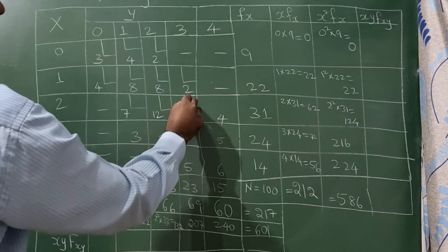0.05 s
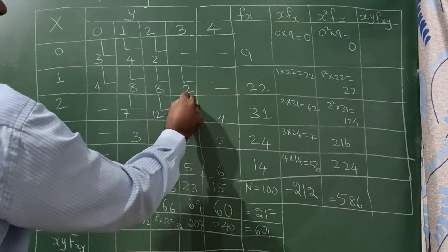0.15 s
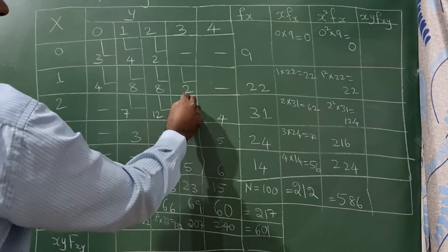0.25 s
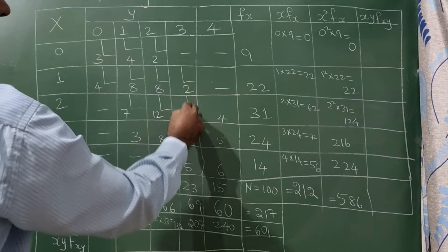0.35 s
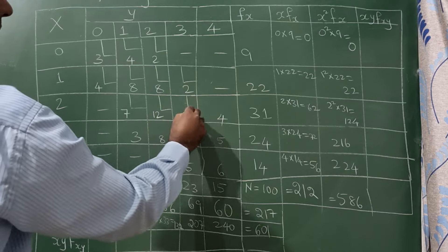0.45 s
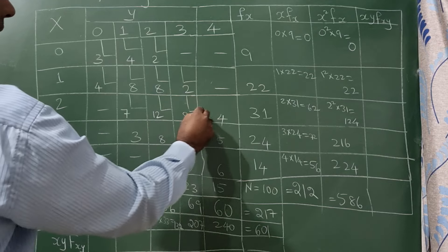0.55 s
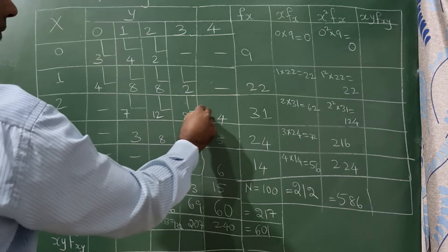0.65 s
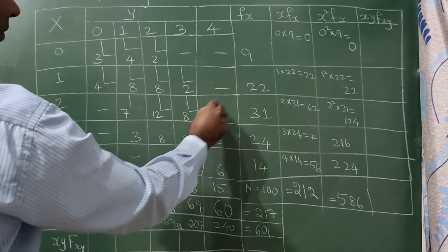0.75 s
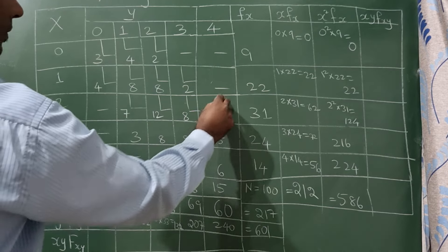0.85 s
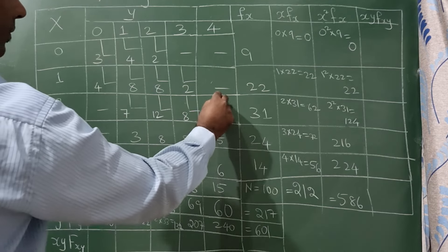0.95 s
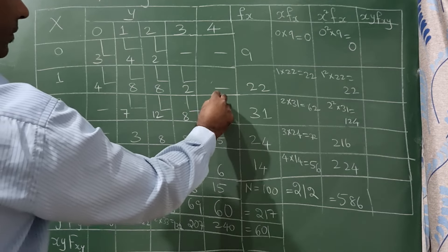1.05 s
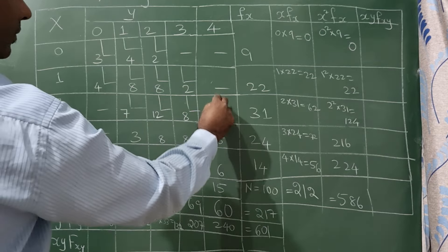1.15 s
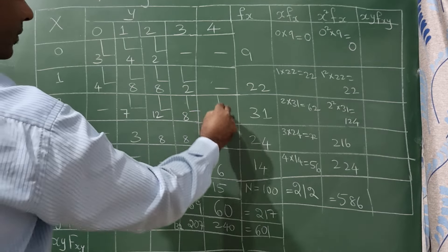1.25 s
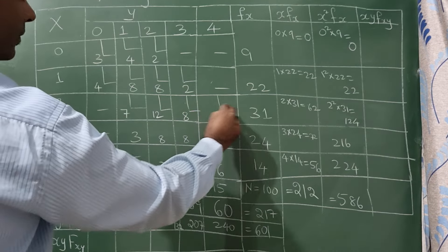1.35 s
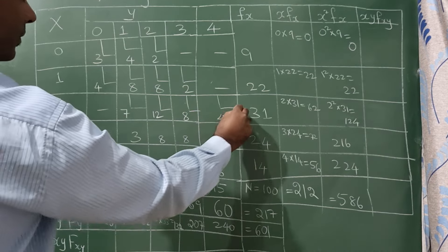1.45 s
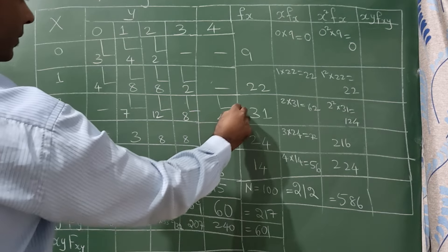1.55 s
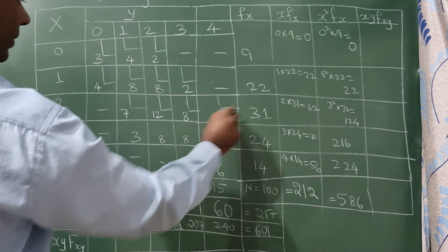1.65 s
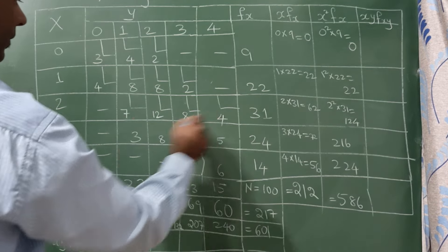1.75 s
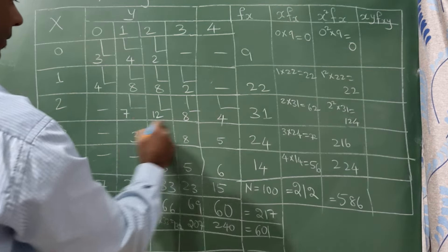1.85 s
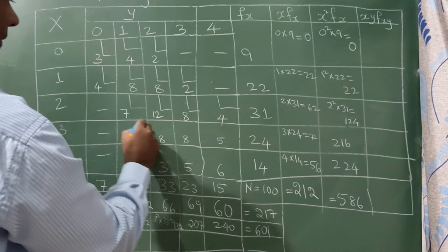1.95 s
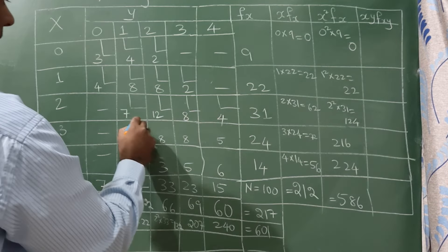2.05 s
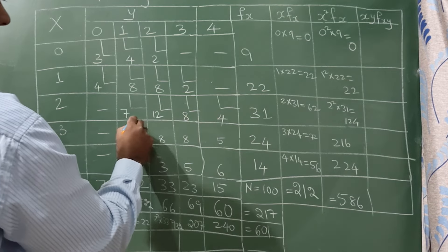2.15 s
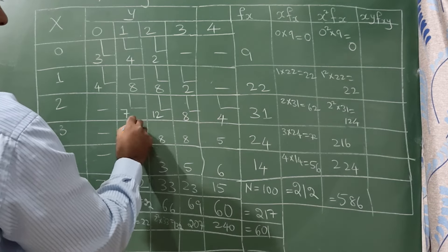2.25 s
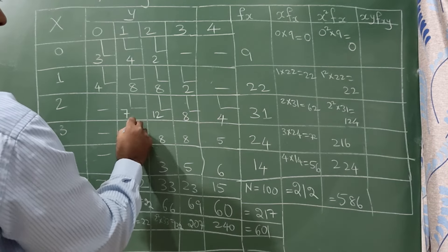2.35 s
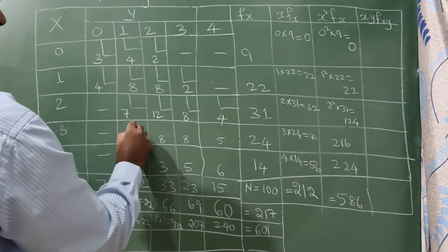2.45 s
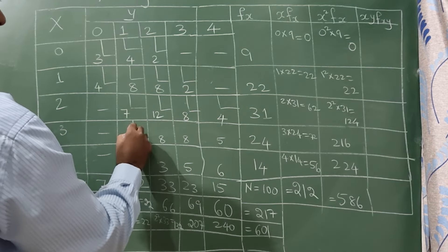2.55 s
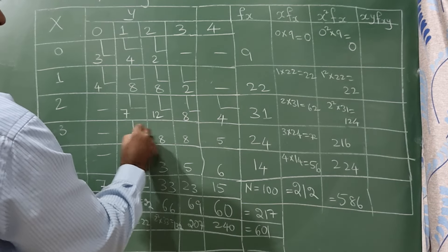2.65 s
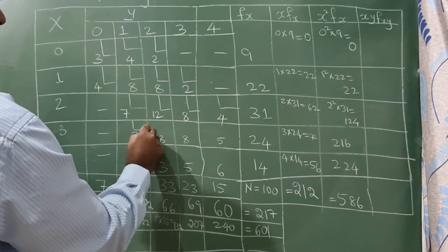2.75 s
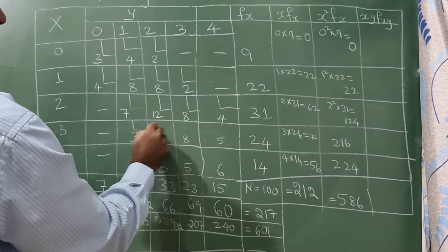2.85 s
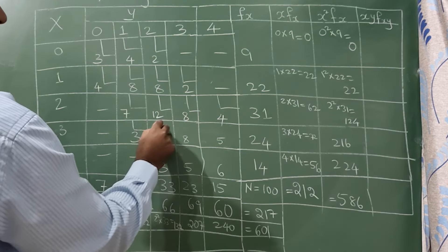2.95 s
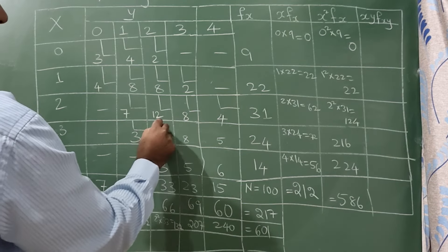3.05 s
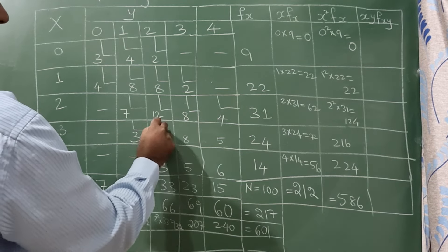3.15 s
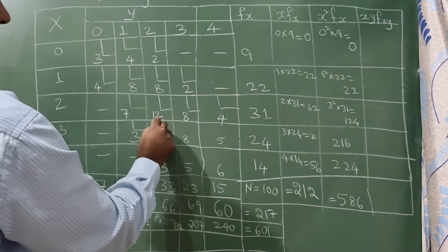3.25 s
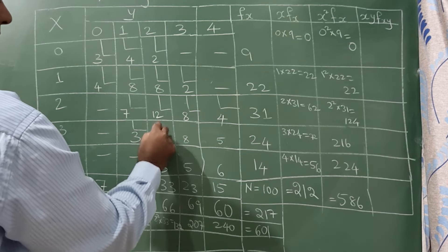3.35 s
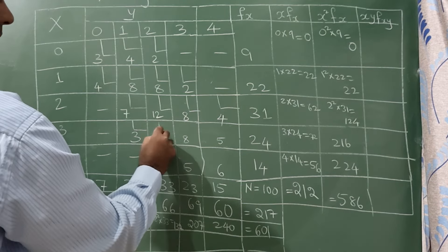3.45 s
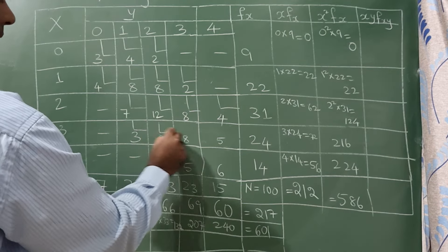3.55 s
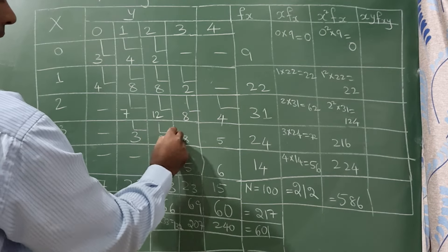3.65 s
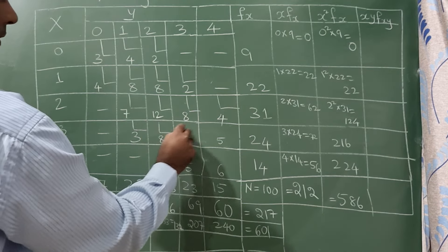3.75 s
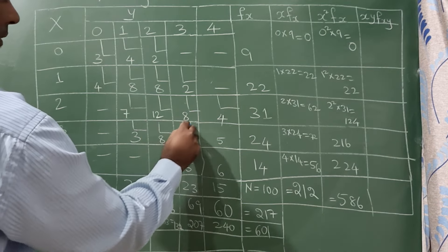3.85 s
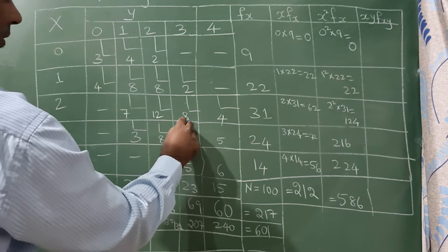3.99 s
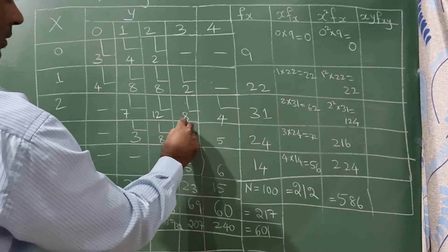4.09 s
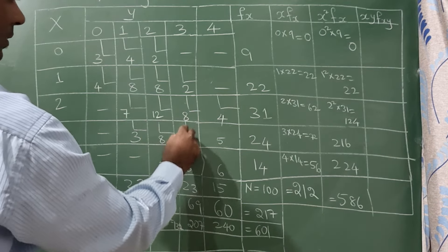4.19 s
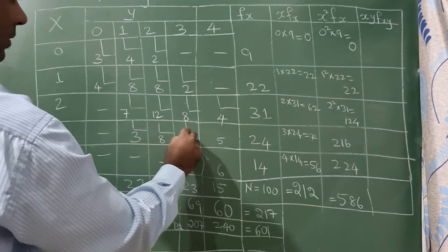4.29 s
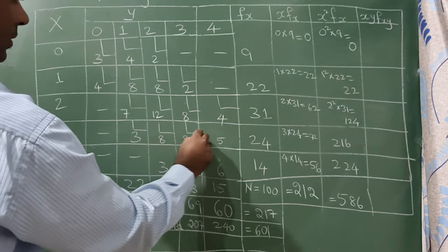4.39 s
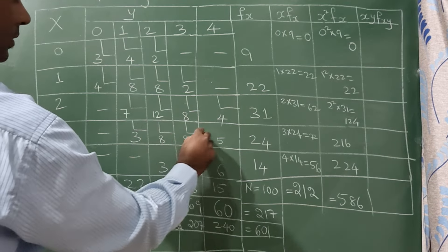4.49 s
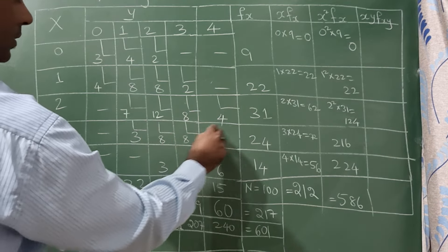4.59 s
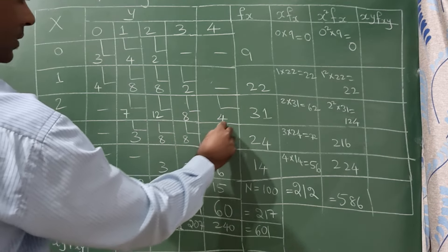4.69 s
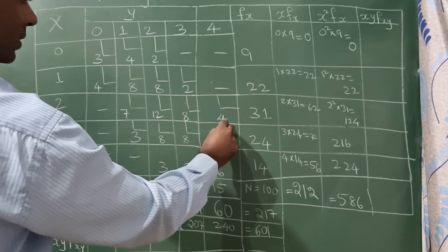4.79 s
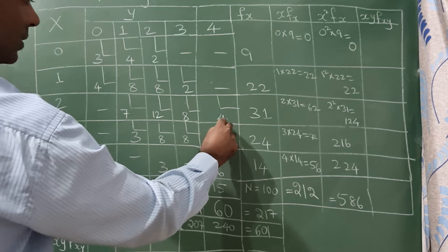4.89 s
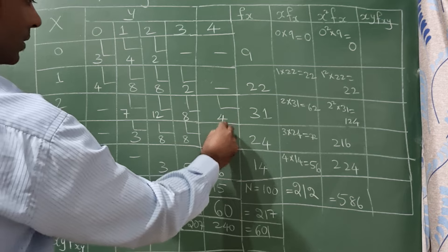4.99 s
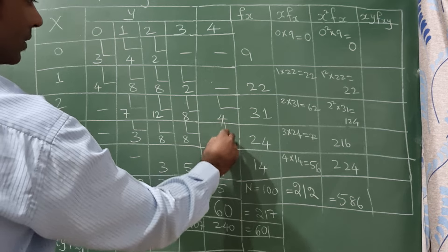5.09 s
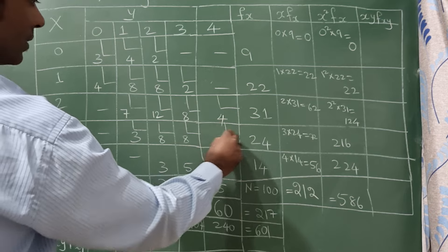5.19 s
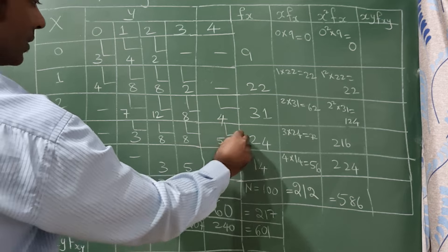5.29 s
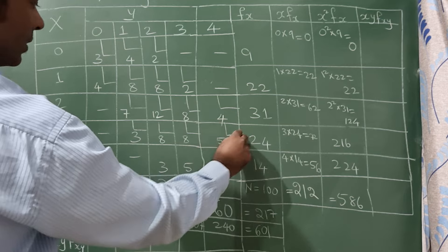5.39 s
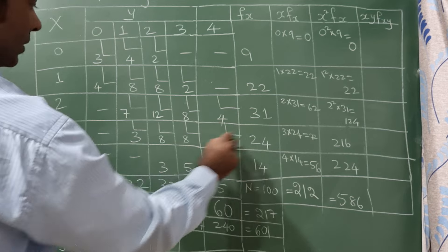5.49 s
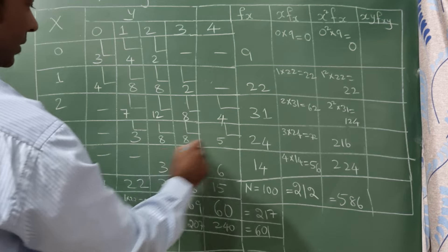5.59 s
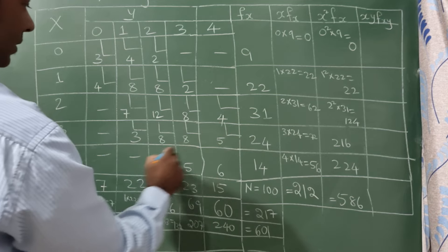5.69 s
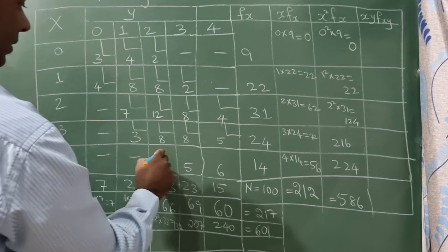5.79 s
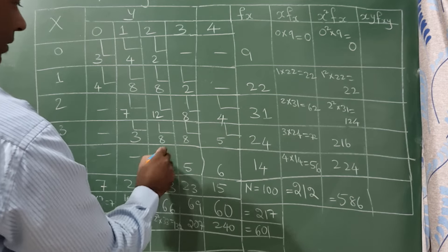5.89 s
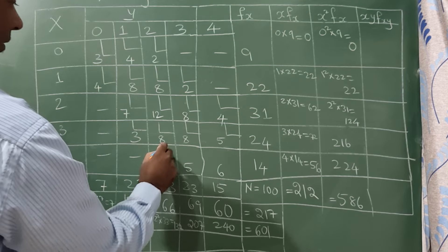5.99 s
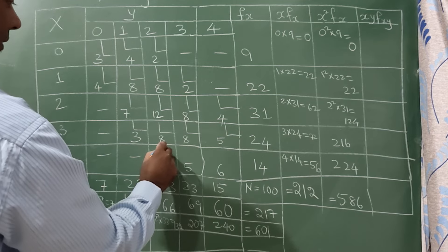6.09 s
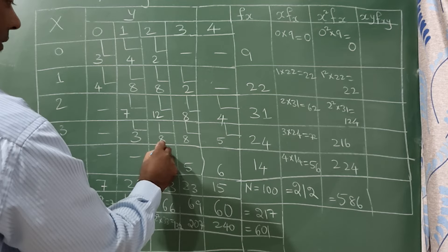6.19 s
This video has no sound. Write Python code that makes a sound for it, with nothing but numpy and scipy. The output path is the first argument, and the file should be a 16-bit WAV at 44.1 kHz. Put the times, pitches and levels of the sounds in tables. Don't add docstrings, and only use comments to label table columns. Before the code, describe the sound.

Chalk lands on a board roughly every second, six times, with resonant woody knocks dominating and a lively room tail. After each come two tiny gritty scrapes, much quieter, the second shaking the board slightly. The second knock is softest but has a crisp tip crack, and its mark ends in a skip. Faint cloth rustles and crumb clicks fill the gaps above low fan rumble and hiss, picked up by a phone two metres away.

```python
import sys
import numpy as np
from scipy import signal
from scipy.fft import rfft, irfft, next_fast_len
from scipy.io import wavfile
from scipy.ndimage import uniform_filter1d, map_coordinates

SR = 44100
rng = np.random.default_rng(int(sys.argv[2]) if len(sys.argv) > 2 else 0)


def magnitude_from_level(level_db):
    exponent = np.asarray(level_db, float) / 20
    return 10 ** exponent


def waveform_to_disk(signal):
    frames = np.transpose(np.atleast_2d(signal))
    scaled = np.clip(frames, -1, 1) * 32767
    samples = np.round(scaled).astype(np.int16)
    wavfile.write(sys.argv[1], SR, samples)


N = 274743

# (frequency [Hz], level [dB per Hz])
AIR_SPECTRUM = [(15, -40), (25, -59), (38, -8.5), (59, 0.5), (127, -3), (186, -6), (418, -15.5), (645, -13),
                (719, -19), (780, -16.5), (2120, -25.5), (4540, -29), (9420, -30.5), (14500, -28.5),
                (16200, -38)]
# (frequency [Hz], width [Hz], level [dB])
FAN_WHINE = (648, 14, -67)
# (time [s], level [dB])
DUST_WHIFFS = [
    (0.08, -63),
    (1.65, -59),
    (3.01, -60),
    (4.85, -63),
]
# (frequency [Hz], level [dB per Hz])
DUST_SPECTRUM = [(5500, -30), (7500, -3), (8500, -1), (9500, -2), (12000, -30)]
# (time [s], level [dB])
SLEEVE_RUSTLES = [
    (0.084, -54.5),
    (1.082, -57.5),
    (2.082, -51),
    (4.082, -51),
    (6.084, -54.5),
]
# (frequency [Hz], level [dB per Hz])
CLOTH_SPECTRUM = [(500, -9), (1200, 5.5), (2700, -1), (4500, 0.5), (7000, -12)]

# (time [s], peak [dB], crack [dB], room [dB], crack brightness [dB])
KNOCKS = [
    (0.284, -6, -21.5, 5, -2),
    (1.154, -13.5, -3.5, 7.5, -10),
    (2.381, -6.5, -21.5, 8, 14),
    (3.287, -7.5, -27, 5, 2),
    (4.131, -5, -18, 5.5, 4),
    (4.987, -10.5, -26, 7, 6),
]
# (frequency [Hz], level [dB per Hz])
KNOCK_SPOTS = [
    [(275, -2), (326, -24), (370, -1), (432, -11.5), (574, -3), (915, 1.5), (1880, -16), (2430, -33.5)],
    [(267, -19.5), (342, -4.5), (419, -18.5), (648, 0), (1150, -15), (1330, -3), (2250, -29), (3170, -30)],
    [(299, -10.5), (381, -6.5), (426, -10), (634, 1), (1040, -13.5), (1290, -9), (1990, -23), (2430, -43)],
    [(271, -5.5), (308, -15.5), (381, 0.5), (420, -11.5), (574, 0), (784, -3.5), (1500, -13), (2170, -32.5)],
    [(275, -6), (312, -20), (375, -3), (420, -9), (471, -7), (795, -0.5), (1940, -22), (2170, -33.5)],
    [(239, -23), (331, -5), (420, -21), (652, -1.5), (915, 0), (1130, -4.5), (1660, -16), (2230, -36)],
]
# (frequency [Hz], level [dB per Hz])
BOARD_LOW = [(100, -39), (170, -23.5)]
# (frequency [Hz], level [dB per Hz])
BOARD_HIGH = [(3600, -41), (5000, -54.5), (6500, -70), (11000, -120)]
# (frequency [Hz], level [dB], time to fall 60 dB [s])
BOARD_MODES = [(172.8, 9.5, 1), (237.6, -4, 1), (287, -4, 1), (319, 6.5, 0.099), (380.3, 14.5, 0.36),
               (482.8, 20, 0.26), (536, 2.5, 0.65), (651.4, 3, 0.59), (627, 3, 0.38), (593, 5.5, 0.45),
               (1050, -17, 0.45), (1350, -13, 0.44), (1700, -6, 0.15), (1913, 9, 0.33), (801, 10, 0.36),
               (827, 13.5, 0.2), (933, 9.5, 0.43), (967, -1.5, 0.41), (1130, -17, 0.26), (1300, -17, .35),
               (1490, 13, 0.26), (1830, -17, 0.13)]
# (frequency [Hz], time to fall 60 dB [s])
ROOM_DECAY = [(150, 0.95), (400, 0.79), (1000, 0.49), (2500, 0.57), (6000, 0.74)]
# (frequency [Hz], level [dB per Hz])
CRACK_SPECTRUM = [(1500, -83), (3000, 10.5), (4500, 5), (6500, -6), (8500, -12), (11500, -11), (14000, -6),
                  (15800, -16), (18000, -54)]
# (frequency [Hz], level [dB per Hz])
THUD_SPECTRUM = [(25, -25), (55, -1), (110, -7.5), (150, 1.5), (230, -38), (500, -86)]

# (full speed from [s], held [s], squeak [dB], grit [dB], stick resonance [Hz])
STROKES = [(0.398, .046, -51.5, -54, 12500), (0.6, 0.044, -51.5, -55.5, 12700),
           (1.29, 0.015, -53, -52, 13100), (1.485, 0.059, -46, -50, 13400), (2.48, .07, -55, -62, 12200),
           (2.755, 0.038, -49, -60.5, 13900), (3.44, 0.016, -45.5, -58, 12100),
           (3.63, 0.024, -46.5, -54.5, 11200), (4.224, 0.059, -51, -55.5, 12100),
           (4.445, 0.011, -46.5, -54.5, 11400), (5.105, 0.056, -55, -58, 12800),
           (5.308, 0.037, -49, -52, 12200)]
# (time [s], held [s], level [dB])
GLIDES = [
    (1.72, 0.24, -61.5),
    (5.6, 0.15, -62),
]
# (frequency [Hz], level [dB per Hz])
SQUEAK_SPECTRUM = [(4710, -38), (8000, -12), (9610, -7.5), (11100, -1), (13200, -5), (14400, 4.5),
                   (15300, -1), (16200, -13.5)]
# (frequency [Hz], level [dB per Hz])
GRIT_SPECTRUM = [(1470, -44), (2500, 2), (3250, 0.5), (3520, -4), (3710, -3), (5070, 1), (6550, -5),
                 (8120, -4), (10000, -4.5), (13000, -36), (22000, -120)]
# (frequency [Hz], width [Hz], lift [dB])
STICK_MODES = [(3750, 250, 3), (6300, 350, 5)]
# (peak time [s], held [s], level [dB])
DRAGS = [
    (0.611, 0.016, -41),
    (1.518, 0.0076, -35),
    (2.756, 0.012, -47),
    (3.63, 0.019, -41.5),
    (4.435, .05, -41.5),
    (5.3, 0.058, -39),
]
# (frequency [Hz], level [dB per Hz])
DRAG_SPOTS = [
    [(300, -17), (480, -4), (653, -28), (811, -1.5), (1540, -12.5), (1750, -6), (2000, -26)],
    [(300, -8.5), (653, -20), (1070, -10), (1230, -2.5), (1670, -12), (1880, -2), (2020, -20)],
    [(300, 1), (895, -4.5), (1360, -9), (1650, -11)],
    [(300, -1), (585, -3), (677, 2.5), (1160, -6.5), (1600, -4), (2290, -21)],
    [(300, -0.5), (714, -6), (1000, 1.5), (1300, -7.5), (1580, -6.5), (1750, -17), (2210, -18)],
    [(300, -6.5), (393, -16), (560, -2.5), (635, -12.5), (903, 0.5), (1200, 0), (1500, -6)],
]
# (frequency [Hz], level [dB per Hz])
DRAG_LOW = [(180, -41.5)]
# (frequency [Hz], level [dB per Hz])
DRAG_HIGH = [(2600, -17.5), (3380, -55), (5720, -120)]

# (time [s], peak [dB])
SNAPS = [
    (1.5469, -19.5),
]
# (frequency [Hz], level [dB], time to fall 60 dB [s])
SNAP_MODES = [(1354, -7, 0.27), (1833, 5.5, 0.068), (2330, -2, 0.036), (2400, -18, .03)]
# (frequency [Hz], level [dB per Hz])
SNAP_SPECTRUM = [(500, -24), (900, -5), (1100, -31), (1300, -11), (1550, -10), (1840, -1), (2400, -5),
                 (2750, -19.5), (4000, -27), (6000, -51)]
# (time [s], peak [dB], frequency [Hz])
CRUMBS = [
    (1.5427, -29, 13900),
    (2.6983, -43, 14800),
    (2.7277, -43.5, 14300),
    (3.8606, -32.5, 9950),
    (5.5517, -35, 13300),
    (5.8505, -44, 13900),
]
# (frequency [Hz], side against middle [dB])
SIDE_LEVEL = [(60, -38), (110, -35), (200, -31), (380, -29), (700, -31), (1290, -29), (2380, -21),
              (4400, -33), (8120, -17), (15000, -27)]


def unit(x):
    return x / np.sqrt(np.mean(x ** 2) + 1e-20)


def along(points, hz):
    f, v = np.transpose(points)
    return np.interp(np.log(hz + 1), np.log(f + 1), v)


def wobble(rate):
    knots = rng.standard_normal(int(N * rate / SR) + 4)
    return map_coordinates(knots, [np.arange(N) * rate / SR])


def coloured(x, spectrum):
    m = 2 * next_fast_len(len(x) // 2 + 4096)
    gain = magnitude_from_level(along(spectrum, np.fft.rfftfreq(m, 1 / SR)))
    cepstrum = irfft(np.log(np.maximum(gain, 1e-6)), m)
    cepstrum[1:m // 2] *= 2
    cepstrum[m // 2 + 1:] = 0
    return irfft(rfft(x, m) * np.exp(rfft(cepstrum)), m)[:len(x)]


def resonant(x, centre_hz, width, lift_db):
    hz, t, z = signal.stft(x, SR, nperseg=512)
    centre = centre_hz[np.minimum((t * SR).astype(int), N - 1)]
    peak = 1 / np.sqrt(1 + ((hz[:, None] - centre) / (width * centre)) ** 2)
    return signal.istft(z * (1 + magnitude_from_level(lift_db) * peak ** 2), SR, nperseg=512)[1][:N]


def patchy(x, depth_db):
    z = signal.stft(x, nperseg=256)[2]
    field = uniform_filter1d(rng.standard_normal(z.shape), size=5, axis=0)
    field = uniform_filter1d(field, size=30, axis=1)
    return signal.istft(z * magnitude_from_level(depth_db * unit(field)), nperseg=256)[1][:N]


def grains(size):
    present = rng.random(size) < 0.5
    strength = magnitude_from_level(1.5 * rng.standard_normal(size))
    return present * strength * rng.standard_normal(size)


def tail(gap_s):
    hz, t, z = signal.stft(rng.standard_normal(SR), SR, nperseg=256)
    fade_db = -60 * t / along(ROOM_DECAY, hz)[:, None]
    closing_db = -6.04 * (t / 0.18) ** 2
    x = signal.istft(z * magnitude_from_level(fade_db + closing_db), SR, nperseg=256)[1][:SR]
    x = x * (1 - np.exp(-np.arange(SR) / SR / gap_s))
    return x / np.linalg.norm(x)


def ring(modes, scatter_db):
    t, out = np.arange(SR) / SR, np.zeros(SR)
    for hz, db, t60 in modes:
        level_db = db + scatter_db * rng.standard_normal() - 60 * t / t60
        out += rng.choice([-1, 1]) * magnitude_from_level(level_db) * np.sin(2 * np.pi * hz * t)
    return out


def add(track, s, sound):
    part = track[round(s * SR):][:len(sound)]
    part += sound[:len(part)]


def swell(s, held_s, rise, fall):
    t = np.arange(N) / SR
    return -rise * np.maximum(s - t, 0) - fall * np.maximum(t - s - held_s, 0)


def glide_db():
    return np.max([db + swell(s, held, rise=33, fall=17) for s, held, db in GLIDES], axis=0)


def air():
    hz, width, db = FAN_WHINE
    phase = 2 * np.pi * np.cumsum(hz + width * wobble(40)) / SR
    whine = np.sin(phase) * magnitude_from_level(db + 3.0 * wobble(23))
    t, close_s = np.arange(N) / SR, 0.28
    opening = np.max([(t > s) * np.exp(-np.abs(t - s) / close_s) for s, *_ in KNOCKS], axis=0)
    opening += magnitude_from_level(glide_db() + 55.5)
    level_db = -54 + 5 * opening + 3 + 0.6 * wobble(2.59)
    return magnitude_from_level(level_db) * unit(coloured(rng.standard_normal(N), AIR_SPECTRUM)) + whine


def dust():
    whiff_db = np.max([db + swell(s, 0, rise=160, fall=160) for s, db in DUST_WHIFFS], axis=0)
    return magnitude_from_level(whiff_db) * unit(coloured(grains(N), DUST_SPECTRUM))


def sleeve():
    rustle_db = np.max([db + swell(s, 0, rise=1300, fall=100) for s, db in SLEEVE_RUSTLES], axis=0)
    return magnitude_from_level(rustle_db + 2.0 * wobble(80)) * unit(coloured(rng.standard_normal(N), CLOTH_SPECTRUM))


def board_knock(spot, room_db):
    t, wall_delay_s, wall_db = np.arange(SR) / SR, 0.009, -2.5
    modes = ring(BOARD_MODES, scatter_db=1.5)
    body = magnitude_from_level(-7.5) * modes / np.linalg.norm(modes)
    flex = magnitude_from_level(-23.0 - 60 * t / 0.032) * rng.standard_normal(SR)
    flex[0] = magnitude_from_level(-20)
    wall_echo = magnitude_from_level(wall_db) * np.roll(flex, round(wall_delay_s * SR))
    body += magnitude_from_level(room_db) * tail(gap_s=0.001) + flex + wall_echo
    return coloured(body, BOARD_LOW + spot + BOARD_HIGH)


def tip_crack(bright_db):
    t = np.arange(SR) / SR
    spectrum = [(hz, level + bright_db * (hz > 7000)) for hz, level in CRACK_SPECTRUM]
    crack = coloured(rng.standard_normal(SR) * magnitude_from_level(-60 * t / 0.018), spectrum)
    return crack + magnitude_from_level(-10) * signal.fftconvolve(crack, tail(gap_s=0.0032))[:SR]


def knocks():
    out = np.zeros(N)
    for (s, db, crack_db, room_db, bright_db), spot in zip(KNOCKS, KNOCK_SPOTS):
        thud = coloured(tail(gap_s=0.0074), THUD_SPECTRUM)
        add(out, s, magnitude_from_level(db - 21) * unit(board_knock(spot, room_db)))
        add(out, s, magnitude_from_level(db - 49.5) * unit(thud))
        add(out, s, magnitude_from_level(db + crack_db - 36.0) * unit(tip_crack(bright_db)))
    return out


def squeak(slip):
    middle_s = [s + held / 2 for s, held, *_ in STROKES]
    stick_hz = np.interp(np.arange(N) / SR, middle_s, [row[-1] for row in STROKES])
    sound = resonant(coloured(grains(N), SQUEAK_SPECTRUM), stick_hz, width=0.045, lift_db=3.5)
    sound = resonant(sound, 11300 * (1 + 0.01 * wobble(3.1)), width=0.017, lift_db=-14)
    level_db = np.max([db + swell(s, held, rise=250, fall=210) for s, held, db, _, _ in STROKES], axis=0)
    level_db = np.maximum(level_db, np.maximum(glide_db(), -70.5))
    return magnitude_from_level(level_db + slip) * unit(patchy(sound, depth_db=2.5))


def grit(slip):
    sound = coloured(grains(N), GRIT_SPECTRUM)
    for hz, width, lift_db in STICK_MODES:
        sound = resonant(sound, hz * (1 + 0.03 * wobble(3.19)), width / hz, lift_db)
    level_db = np.max([db + swell(s, held, rise=210, fall=150) for s, held, _, db, _ in STROKES], axis=0)
    level_db = np.maximum(level_db, np.maximum(glide_db() - 2, -68))
    return magnitude_from_level(level_db + slip + 2.5) * unit(patchy(sound, depth_db=2.5))


def board_shake(slip):
    out, lead_s, room_db = np.zeros(N), 0.15, -1.5
    for (s, held, db), spot in zip(DRAGS, DRAG_SPOTS):
        start = s - lead_s
        level = magnitude_from_level(db + swell(s, held, rise=380, fall=360) + slip)[round(start * SR):][:SR // 2]
        shake = level * unit(coloured(grains(SR // 2), DRAG_LOW + spot + DRAG_HIGH))
        room = signal.fftconvolve(shake, tail(gap_s=0.0028))[:SR // 2]
        add(out, start, shake + magnitude_from_level(room_db) * room)
    return out


def strokes():
    slip = 1.2 * wobble(60)
    return squeak(slip) + grit(slip) + board_shake(slip)


def crumbs():
    out, t = np.zeros(N), np.arange(SR // 20) / SR
    for s, db, hz in CRUMBS:
        click = np.sin(2 * np.pi * hz * t) + 0.5 * np.diff(rng.standard_normal(len(t) + 1))
        add(out, s, magnitude_from_level(db - 2 - 60 * t / 0.011) * click)
    return out


def snaps():
    out, t = np.zeros(N), np.arange(SR) / SR
    for s, db in SNAPS:
        hit = ring(SNAP_MODES, scatter_db=0)
        hit += magnitude_from_level(-23) * unit(coloured(tail(gap_s=0.0023), SNAP_SPECTRUM))
        hit *= magnitude_from_level(-4 * (t / 0.09) ** 2)
        add(out, s, magnitude_from_level(db - 22.5) * unit(hit))
    return out


def scene():
    mix = air() + dust() + sleeve() + knocks() + strokes() + crumbs() + snaps()
    return np.tile(mix, (2, 1))


def band_limit(x):
    return signal.sosfilt(signal.butter(12, 16440, fs=SR, output="sos"), x)


def record(dry):
    hz, t, z = signal.stft(dry[0], SR, nperseg=1024)
    random_phase = np.exp(2j * np.pi * rng.random(z.shape))
    scramble = random_phase * magnitude_from_level(along(SIDE_LEVEL, hz) - 3.0)[:, None]
    side = signal.istft(z * scramble, SR, nperseg=1024)[1][:N]
    both = dry * magnitude_from_level([[0.06], [-0.06]]) + np.outer([1, -1], side)
    top_hz = 15830
    both = irfft(rfft(both) * (np.fft.rfftfreq(N, 1 / SR) < top_hz), N)
    return band_limit(both)


dry = scene()
out = record(dry)
waveform_to_disk(out)
```